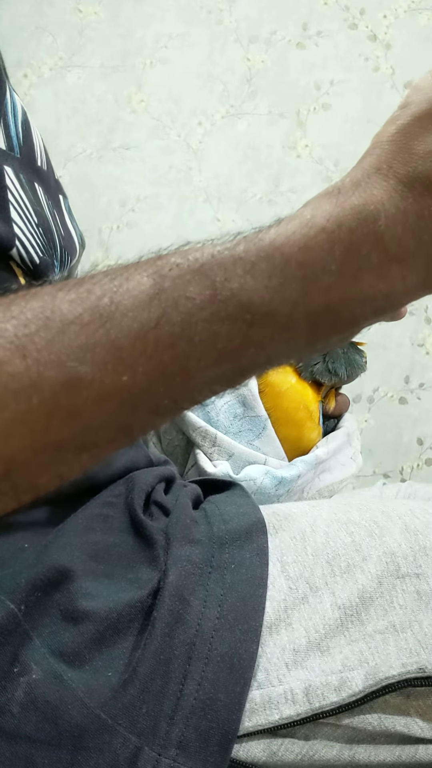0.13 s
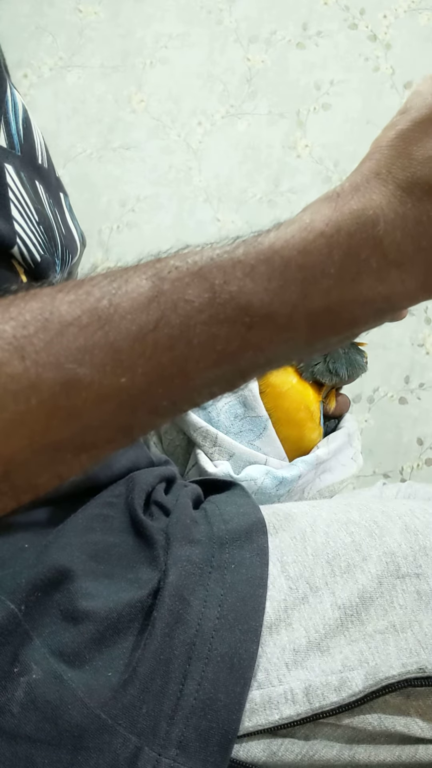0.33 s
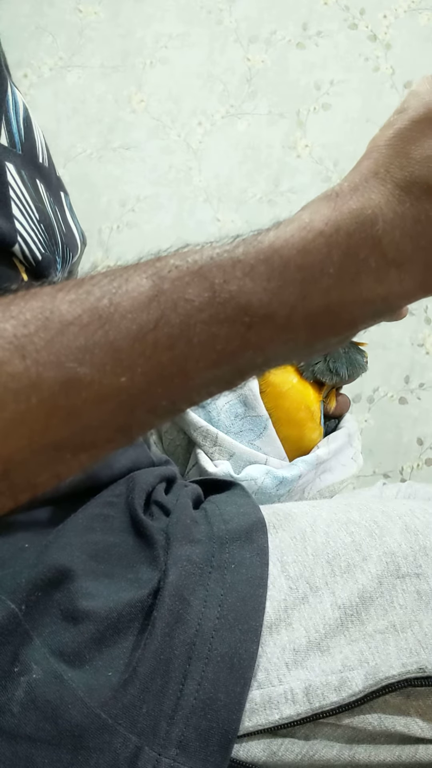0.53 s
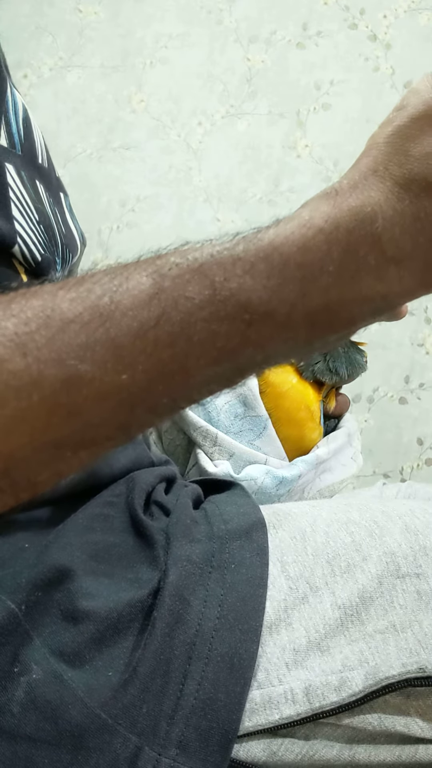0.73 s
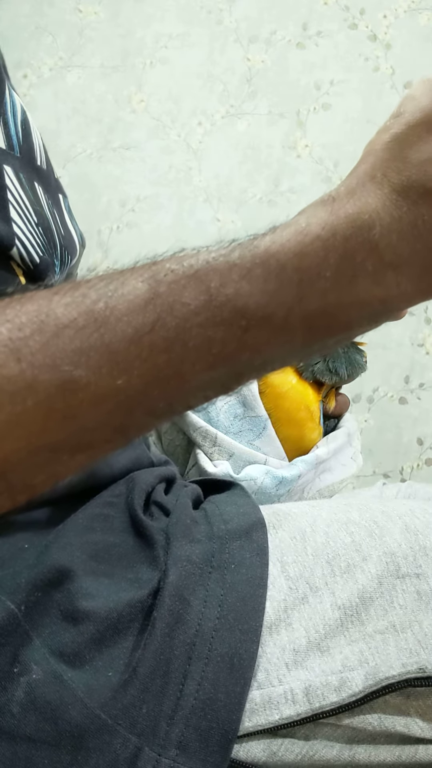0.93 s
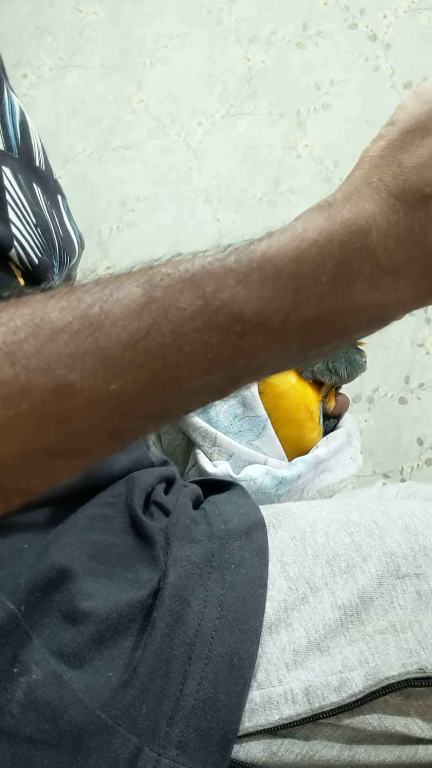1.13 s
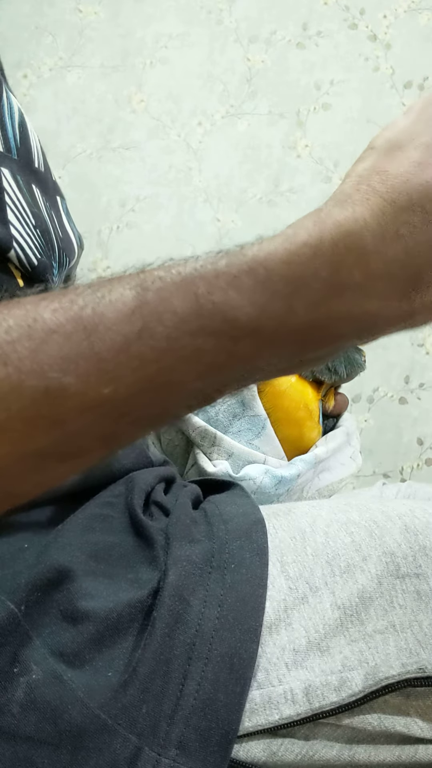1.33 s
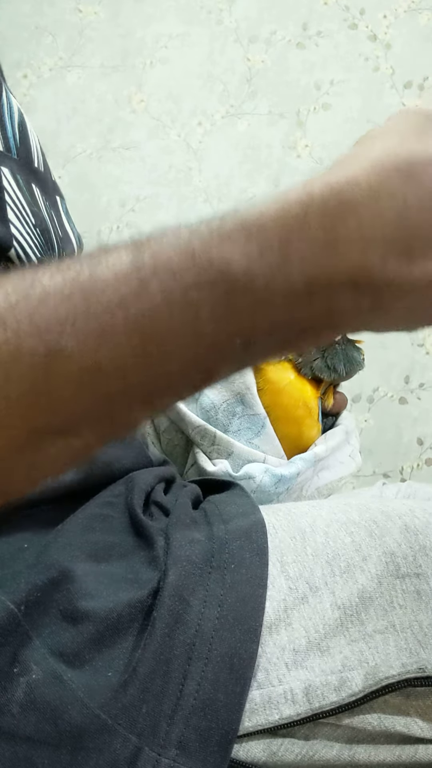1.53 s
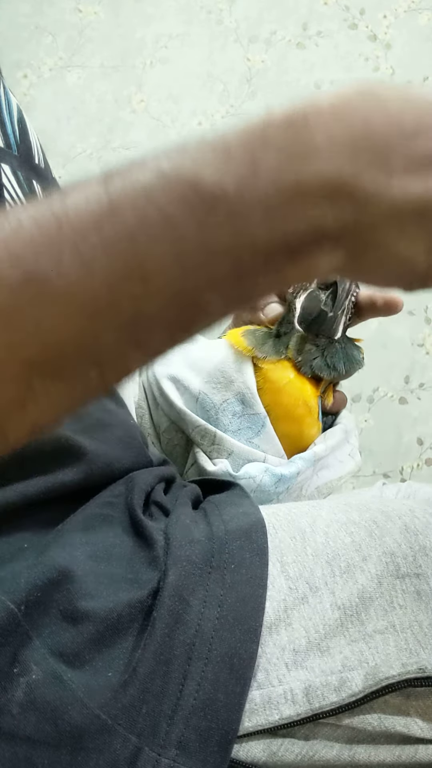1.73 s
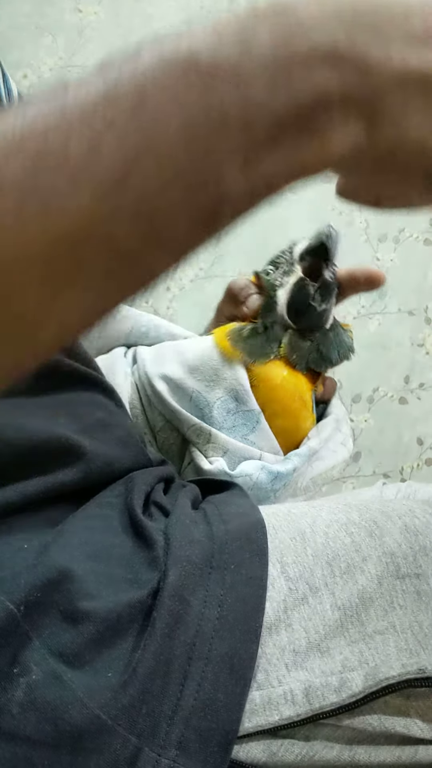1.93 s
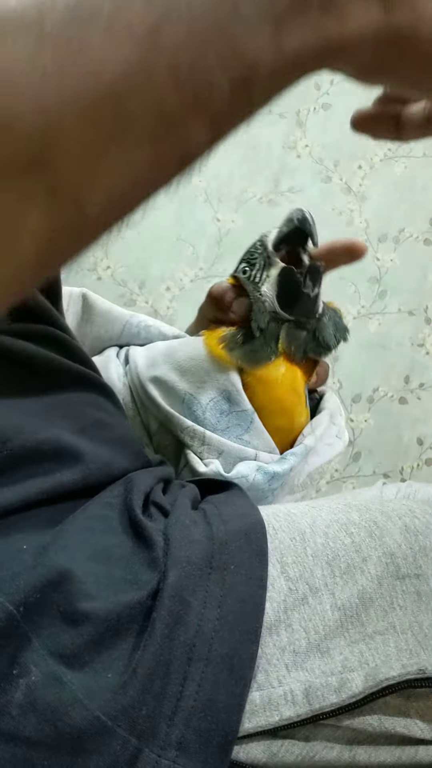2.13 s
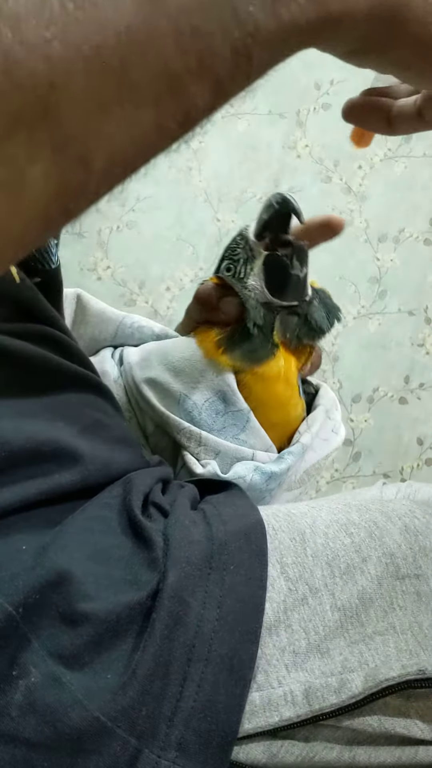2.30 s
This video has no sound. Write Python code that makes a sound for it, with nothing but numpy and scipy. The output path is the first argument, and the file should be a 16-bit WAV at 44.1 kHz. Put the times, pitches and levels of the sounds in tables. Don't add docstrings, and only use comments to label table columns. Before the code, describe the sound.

One loud, harsh squawk from a young macaw held close to the microphone, after nearly two seconds of low fan hum, distant rumble and faint cloth rustle; the bare, hard room rings briefly afterward.

```python
import sys
import numpy as np
from scipy import signal
from scipy.fft import rfft, irfft, next_fast_len
from scipy.io import wavfile
from scipy.ndimage import uniform_filter1d

SR = 44100
rng = np.random.default_rng(int(sys.argv[2]) if len(sys.argv) > 2 else 0)


def wav_out(sig):
    wavfile.write(sys.argv[1], SR, np.round(np.clip(np.atleast_2d(sig).T, -1, 1) * 32767).astype(np.int16))


def gain_from_db(level_db):
    decades = np.asarray(level_db, float) / 20
    return 10 ** decades


N = 108618


def rms_one(x):
    return x / np.sqrt(np.mean(x ** 2) + 1e-20)


def in_time(rows):
    time_s, *columns = np.transpose(rows)
    return [np.interp(np.arange(N) / SR, time_s, column) for column in columns]


def at_hz(points, hz):
    table_hz, value = np.transpose(points)
    return np.interp(np.log(hz + 1), np.log(table_hz), value)


def drift(rate_hz):
    r = np.exp(-2 * np.pi * rate_hz / SR)
    noise = rng.standard_normal(N + SR)
    return rms_one(signal.lfilter([1], [1, -2 * r, r * r], noise)[SR:])


def band(x, low_hz, high_hz):
    edges_hz = [low_hz, min(high_hz, SR / 2.2)]
    return signal.sosfilt(signal.butter(2, edges_hz, "band", fs=SR, output="sos"), x)


def resonance(x, hz, width_hz):
    r = np.exp(-np.pi * width_hz / SR)
    zeros = np.array([1, 0, -1]) * (1 - r * r) / 2
    poles = [1, -2 * r * np.cos(2 * np.pi * hz / SR), r * r]
    return signal.lfilter(zeros, poles, x)


# pitch_hz, width_hz, level_db
HUM_LINES = [(60, 25, -57.5), (116.7, 10.7, -57.5), (174.2, 19, -51), (222.8, 26.5, -51),
             (255.4, 8.6, -60.5), (2740, 660, -66), (5770, 400, -92)]


def fan():
    out = 0
    for pitch_hz, width_hz, level_db in HUM_LINES:
        noise = rng.standard_normal((2, N + SR))
        mid, side = resonance(resonance(noise, pitch_hz, width_hz), pitch_hz, width_hz)[:, SR:]
        unlike = min(0.00018 * pitch_hz, 1)
        out = out + gain_from_db(level_db) * rms_one(mid + unlike * side * [[1], [-1]])
    return out


# pitch_hz, density_db (per Hz)
AIR_SPECTRUM = [(12, -37), (20, -1.5), (65, -2), (85, -39), (107, -12.5), (226, 0), (395, -5.5),
                (1110, -13), (15700, -54.5)]
# pitch_hz, likeness (0-1)
AIR_LIKENESS = [(30, 1), (125, 1), (300, 1), (600, 0.089), (1500, 0.048), (5000, 0.62)]
# pitch_hz, balance_db
AIR_BALANCE = [(60, 1.5), (150, 1.5), (380, 4.5), (950, 1), (2380, -10), (5980, -0.5), (15000, -14)]


def air(patchy_db):
    out, together = 0, drift(12.0)
    edges_hz = 20 * 2 ** np.arange(0, 10.1, .5)
    white = rng.standard_normal((2, 2, N))
    for k, (low_hz, high_hz) in enumerate(zip(edges_hz, edges_hz[1:])):
        mid, side = band(white[k % 2], low_hz, high_hz)
        hz = np.sqrt(low_hz * high_hz)
        alike = at_hz(AIR_LIKENESS, hz)
        flicker_db = patchy_db * (0.067 * together + drift(7.8))
        gain = gain_from_db(at_hz(AIR_SPECTRUM, hz) + flicker_db)
        sides = gain_from_db(at_hz(AIR_BALANCE, hz) / 2 * np.array([[1], [-1]]))
        stereo = np.sqrt(1 + alike) * mid + np.sqrt(1 - alike) * side * [[1], [-1]]
        out = out + gain * sides * stereo
    return gain_from_db(-46.0) * rms_one(out)


def mic_hiss():
    return gain_from_db(-75.5) * rms_one(band(rng.standard_normal((2, N)), 6000, 13300))


# centre_s, half_length_s, low_hz, high_hz, level_db
SWELLS = [
    (0.38, 0.22, 400, 1250, -50.5),
    (0.992, 0.16, 570, 1150, -49.5),
    (0.495, 0.05, 940, 985, -46),
    (0.89, 0.26, 3170, 3250, -66),
    (0.71, 0.055, 2720, 2800, -63),
    (0.982, 0.066, 1090, 1170, -50.5),
    (1.01, 0.12, 1650, 1800, -59.5),
    (0.74, .03, 5600, 11500, -70.5),
    (1.31, 0.049, 6300, 22000, -67),
    (1.485, .09, 6700, 10400, -67.5),
]


def swells():
    t, out = np.arange(N) / SR, 0
    for centre_s, half_length_s, low_hz, high_hz, level_db in SWELLS:
        noise = rms_one(band(rng.standard_normal((2, N)), low_hz, high_hz))
        rise_and_fall = np.exp(-((t - centre_s) / half_length_s) ** 2)
        out = out + gain_from_db(level_db + 2.0 * drift(10)) * rise_and_fall * noise
    return out


# start_s, pitch_hz
FREE_WHISTLE = [(1.976, 1703), (1.992, 1739), (2.016, 1882), (2.045, 1894), (2.075, 1884), (2.09, 1795),
                (2.105, 1850), (2.12, 1730), (2.146, 1390)]


def syrinx(pulse_hz):
    FIRST_RING_HZ, LOCK_ORDER, RESTRUCK_FROM_S, PULL_CYCLES = 1440, 5, 2.095, .045
    t = np.arange(N) / SR
    unlocked = t > FREE_WHISTLE[0][0]
    free = unlocked & (t < RESTRUCK_FROM_S)
    steady_turns = np.cumsum(pulse_hz) / SR
    steady_turns = steady_turns - steady_turns[int(CALL[0][0] * SR)] - .3
    free_hz = in_time(FREE_WHISTLE)[0] * (1 + 0.00334 * drift(47))
    locked_hz = np.maximum(LOCK_ORDER * pulse_hz, FIRST_RING_HZ)
    whistle_hz = np.where(unlocked, free_hz, locked_hz)
    restruck_turns = steady_turns % 1 * whistle_hz / pulse_hz
    swing_rad = 2 * np.pi * np.where(free, np.cumsum(whistle_hz) / SR, restruck_turns)
    nearest = np.clip(np.searchsorted(steady_turns, np.round(steady_turns)), 0, N - 1)
    turns = steady_turns + PULL_CYCLES * free * np.sin(swing_rad[nearest])
    return steady_turns, turns, swing_rad


def pulse_train(turns, pulse_hz, swing_rad):
    SHIMMER_DB, SWAY = 1.2, 0.035
    on = slice(int(CALL[0][0] * SR), int(CALL[-1][0] * SR))
    pulses = np.zeros(N)
    for k in range(1, 80):
        below_top = k * pulse_hz[on] < SR / 2.3
        pulses[on] += np.cos(2 * np.pi * k * turns[on]) * below_top
    return pulses * gain_from_db(SHIMMER_DB * drift(200)) * (1 + SWAY * np.cos(swing_rad))


# pitch_hz, width_hz, narrow_beak_db, agape_beak_db
THROAT = [(1330, 180, -3, 0), (1680, 360, 7.5, -1.5), (2100, 760, -4.5, 3), (2890, 350, 1.5, 4),
          (3430, 310, 7.5, -6), (4290, 224, 3, 8.5), (4950, 630, -2.5, 0), (6700, 1200, -14.5, 0.5),
          (7530, 290, 10, 8.5), (9700, 350, 10.5, 12), (11900, 600, -2, 7), (14600, 2600, -18, -10)]


def throat(x, column):
    x = gain_from_db(-10) * band(x, 983, 4760)
    for row in THROAT:
        x = x + (gain_from_db(row[column]) - 1) * resonance(x, row[0], row[1])
    return x


def beak(source):
    GAPE_FROM_S, GAPE_OVER_S, SHUT_FROM_S = 1.965, .04, 2.09
    t = np.arange(N) / SR
    nearest_end_s = np.minimum(t - GAPE_FROM_S, SHUT_FROM_S + GAPE_OVER_S - t)
    gape = np.clip(nearest_end_s / GAPE_OVER_S, 0, 1)
    return (1 - gape) * throat(source, column=2) + gape * throat(source, column=3)


def rasp(rough):
    RASP_HZ, WIDTH_HZ, RASP_DB = 1550, 900, -3
    noise = resonance(rng.standard_normal(N), RASP_HZ, WIDTH_HZ)
    return 3.5 * rough * gain_from_db(RASP_DB) * rms_one(resonance(noise, RASP_HZ, WIDTH_HZ))


# start_s, level_db, gate_depth (0-1), overtones_db
WHISTLE_STRENGTH = [(1.9, 4, 0, -12), (1.92, 1.5, 0.21, -12), (1.942, -4, 0.03, 5),
                    (1.968, -4.5, 0.02, -2.5), (1.988, -3, 0.8, 7), (2.022, -15.5, 0.06, -8),
                    (2.08, -20.5, 0.8, 2), (2.098, -6, 0.4, -23), (2.135, 5, 0.04, -8)]
# multiple, level_db
WHISTLE_OVERTONES = [(1, 2.5), (2, -10.5), (3, -13.5), (4, -19), (5, -24)]


def whistle(turns, swing_rad):
    GATE_SHARPNESS, LOW_HZ = 7, 1197
    level_db, depth, over_db = in_time(WHISTLE_STRENGTH)
    tone = 0
    for k, partial_db in WHISTLE_OVERTONES:
        tone = tone + gain_from_db(partial_db + over_db * (k > 1.5)) * np.sin(round(k) * swing_rad)
    flare = GATE_SHARPNESS * np.exp(-GATE_SHARPNESS * (turns % 1))
    tone = 2 * gain_from_db(level_db) * (1 - depth + depth * flare) * tone
    return band(band(tone, LOW_HZ, SR / 2), LOW_HZ, SR / 2)


# multiple, level_db (against the call)
CHEST_PARTIALS = [(1, -29), (2, -23.5), (3, -16.5)]


def chest(steady_turns):
    out = 0
    for k, level_db in CHEST_PARTIALS:
        out = out + gain_from_db(level_db) * np.sqrt(2) * np.cos(2 * np.pi * round(k) * steady_turns)
    return out


# start_s, level_db
BEAK_HISS = [(1.96, -63), (1.99, -32), (2.05, -19), (2.115, -20), (2.14, -44)]


def beak_hiss(gate):
    LOW_HZ, HIGH_HZ = 12900, 16200
    noise = band(rng.standard_normal(N) * (.5 + gate), LOW_HZ, HIGH_HZ)
    return gain_from_db(in_time(BEAK_HISS)[0]) * rms_one(band(noise, LOW_HZ, HIGH_HZ))


# start_s, level_db, pulse_hz, brightness_db
CALL = [
    (1.9, -31, 228.5, -2.5),
    (1.926, -7, 294.3, 5),
    (1.948, -9.5, 340.4, 7),
    (1.982, -9.5, 391.5, 1.5),
    (2.05, -10.5, 407.2, -1),
    (2.098, -11, 374.4, 1),
    (2.116, -12.5, 325.3, 4),
    (2.134, -23.5, 256, -10),
    (2.146, -45, 232, -15),
]
# start_s, roughness (0-1)
ROUGHNESS = [(1.9, .01), (1.96, .02), (1.985, .2), (2.02, .07), (2.07, .04), (2.1, .25), (2.14, .15)]


def squawk():
    BRIGHT_FROM_HZ, THROAT_LOW_HZ, JITTER, BREATH_GAIN = 800, 208, .004, 5
    t = np.arange(N) / SR
    level_db, pulse_hz, bright_db = in_time(CALL)
    rough, = in_time(ROUGHNESS)
    pulse_hz = pulse_hz * (1 + JITTER * drift(120))
    steady_turns, turns, swing_rad = syrinx(pulse_hz)
    gate = np.exp(-4.4 * (turns % 1))
    breath = BREATH_GAIN * rough * rng.standard_normal(N) * gate
    source = pulse_train(turns, pulse_hz, swing_rad) + breath
    source = source + (gain_from_db(bright_db) - 1) * band(source, BRIGHT_FROM_HZ, SR / 2)
    voice = band(beak(source) + rasp(rough), THROAT_LOW_HZ, SR / 2)
    voice = voice + whistle(turns, swing_rad)
    even = voice / np.sqrt(uniform_filter1d(voice ** 2, size=900) + 1e-9)
    flutter = gain_from_db(-36) * rms_one(band(rng.standard_normal(N), 83, 275))
    even = band(even, 17, 21000) + chest(steady_turns) + flutter
    fade = np.clip(np.minimum((t - CALL[0][0]) / .001, (CALL[-1][0] - t) / .004), 0, 1)
    return -(even + beak_hiss(gate)) * fade * gain_from_db(level_db + 4.0)


# pitch_hz, balance_db
BIRD_BALANCE = [(60, -15), (160, -6), (450, 24), (740, 2.5), (2010, -3), (5500, -7), (9080, 5.5),
                (15000, -3.5)]
# pitch_hz, lead_rad
BIRD_PHASE = [(430, .8), (1460, .7), (3010, 2.2), (3450, 1.5), (3750, 4.3), (5600, 4.9), (7840, 6.9),
              (14000, 11)]
# pitch_hz, t60_s
ROOM_T60 = [(200, 0.47), (500, 0.53), (1000, 0.66), (2000, 0.68), (4000, 0.59), (8000, 0.55), (15000, 0.36)]
# pitch_hz, level_db
ROOM_COLOUR = [(500, 4.5), (1100, -1), (1600, -2.5), (2200, -0.5), (2900, 1.5), (4300, -2), (6000, -1),
               (9000, -7)]


def heard(x):
    EARLY_DB, ROOM_DB = -18, -21.5
    size = next_fast_len(N + SR)
    hz = np.arange(size // 2 + 1) * SR / size
    t60_s = at_hz(ROOM_T60, hz)
    tail_gain = gain_from_db(ROOM_DB + at_hz(ROOM_COLOUR, hz))
    left = gain_from_db(at_hz(BIRD_BALANCE, hz) / 2) * np.exp(.5j * at_hz(BIRD_PHASE, hz))
    right = 1 / np.abs(left) * np.exp(-1j * np.angle(left))

    def delay(lag_s):
        return np.exp(-2j * np.pi * hz * lag_s)

    out = []
    for port in (left, right):
        tail = 0
        for k, lag_s in enumerate(rng.uniform(.018, .05, 12)):
            loop = gain_from_db(-60 * lag_s / t60_s) * delay(lag_s)
            tail = tail + (-1) ** k * (1 / (1 - loop) - 1)
        for lag_s in rng.uniform(.001, .005, 3):
            turn = delay(lag_s)
            tail = tail * (turn - .6) / (1 - .6 * turn)
        early = sum(delay(lag_s) * rng.choice([-1, 1]) for lag_s in rng.uniform(.002, .015, 4))
        room = np.abs(port) * (gain_from_db(EARLY_DB) * early + tail_gain * tail)
        out.append(irfft(rfft(x, size) * (port + room), size)[:N])
    return np.array(out)


def scene():
    AIR_LAG_S = 0.00032
    left, right = fan() + air(patchy_db=.6) + mic_hiss() + swells()
    late = np.interp(np.arange(N) - AIR_LAG_S * SR, np.arange(N), right)
    return heard(squawk()) + np.array([left, late])


def low_pass(x):
    return signal.sosfilt(signal.butter(12, 14800, fs=SR, output="sos"), x)


# pitch_hz, width_hz, depth (0-1)
PORT_DIPS = [(1886, 174, 0.41), (6500, 480, 0.7), (8560, 1100, 0.63), (10300, 480, 0.4), (12330, 1600, 0.9),
             (13100, 2400, 0.9)]


def record(dry):
    AGC_FROM_DB, AGC_SHARE, RELEASE_DB_PER_S, CEILING = -24, 0.2, 21, .85
    climb_db = RELEASE_DB_PER_S * np.arange(N) / SR
    level_db = 10 * np.log10(uniform_filter1d(np.mean(dry ** 2, axis=0), size=800) + 1e-12)
    held_db = np.maximum.accumulate(level_db + climb_db) - climb_db
    over_db = uniform_filter1d(np.maximum(held_db - AGC_FROM_DB, 0), size=800)
    mix = dry * gain_from_db(-AGC_SHARE * over_db)
    mix = CEILING * np.tanh(mix / CEILING)
    for pitch_hz, width_hz, depth in PORT_DIPS:
        mix = mix - depth * resonance(mix, pitch_hz, width_hz)
    return low_pass(mix)


dry = scene()
out = record(dry)
wav_out(out)
```